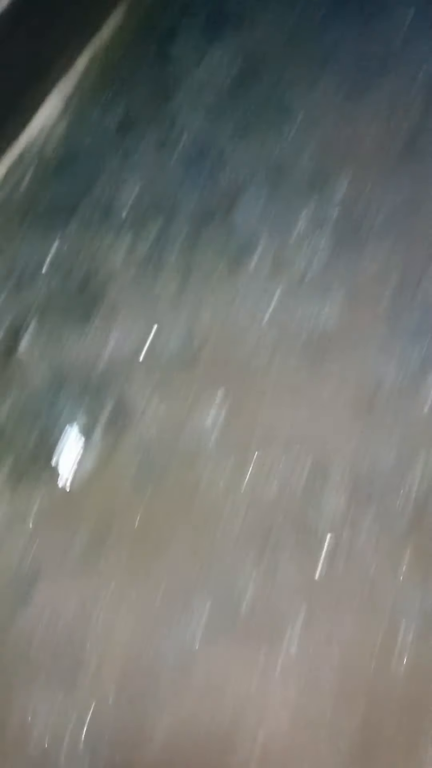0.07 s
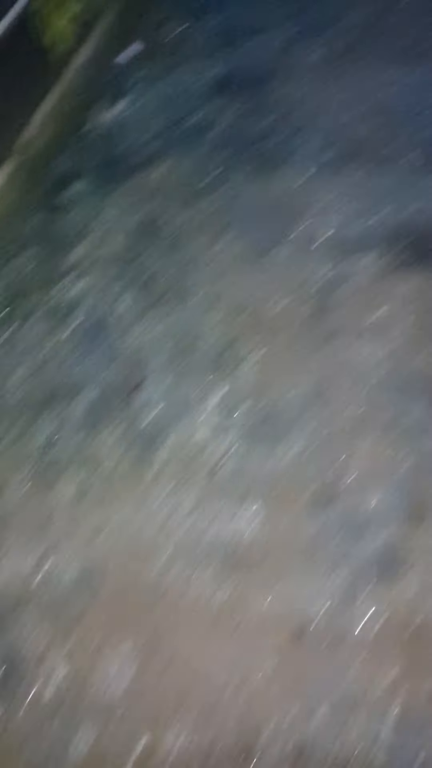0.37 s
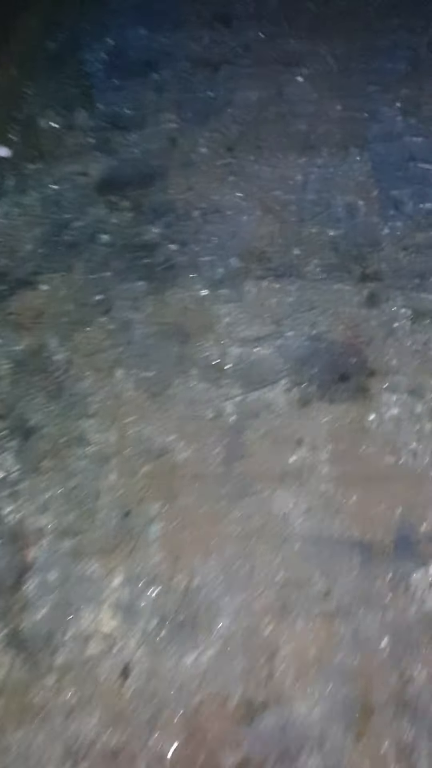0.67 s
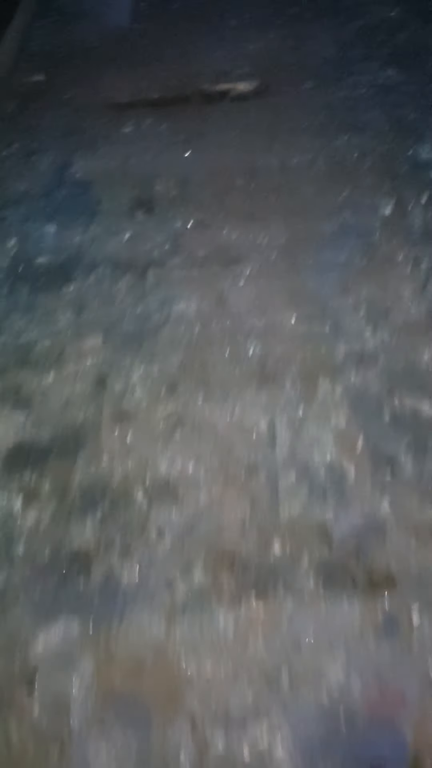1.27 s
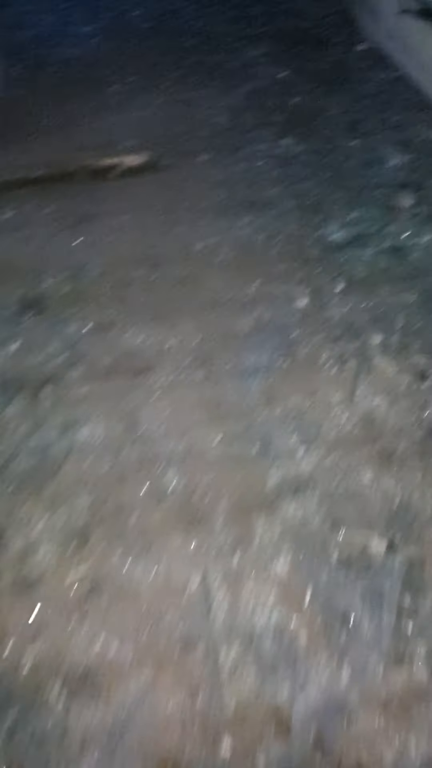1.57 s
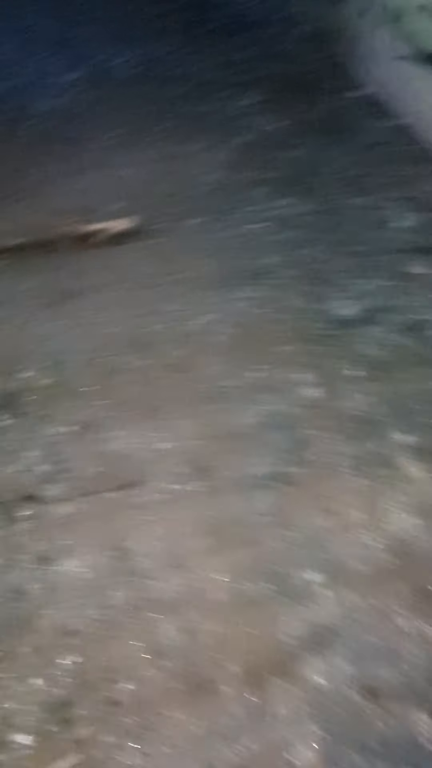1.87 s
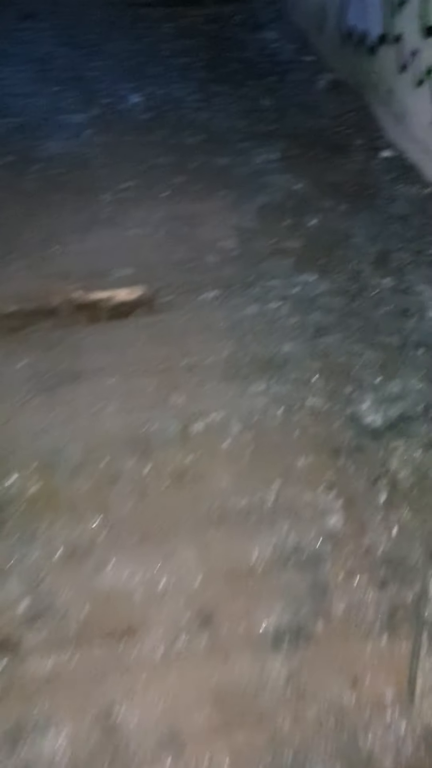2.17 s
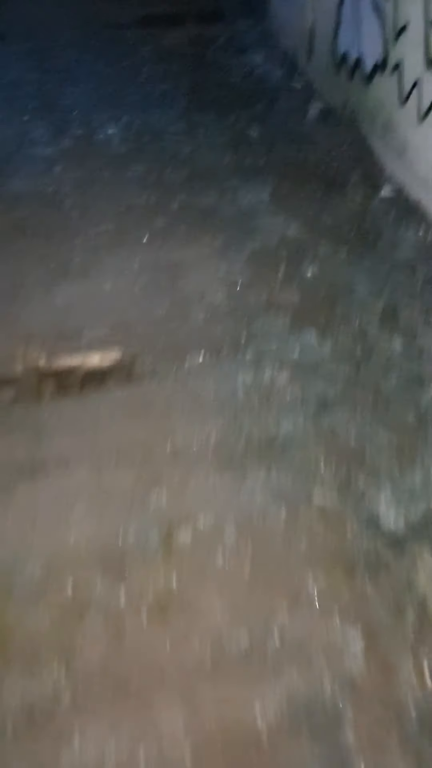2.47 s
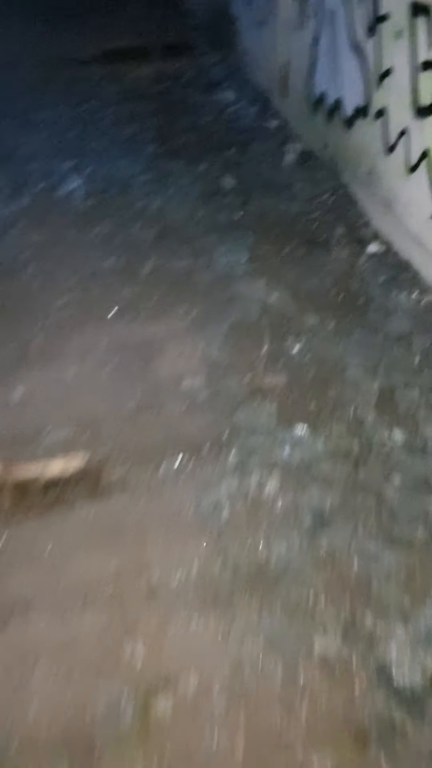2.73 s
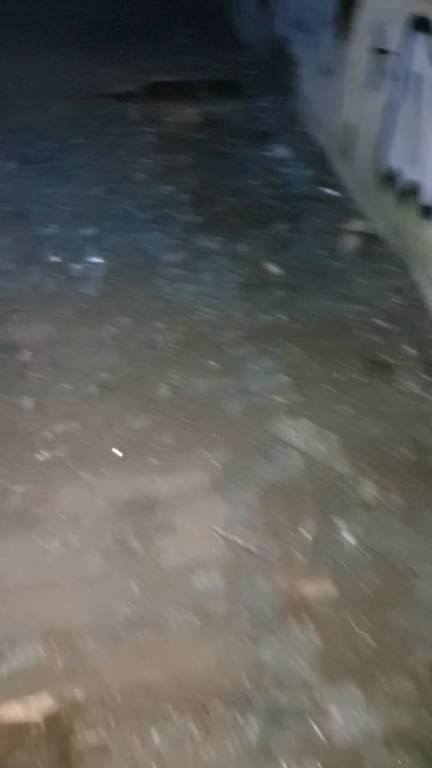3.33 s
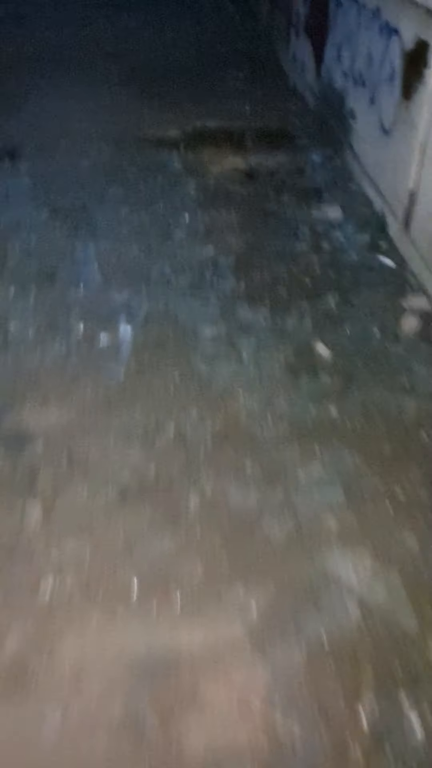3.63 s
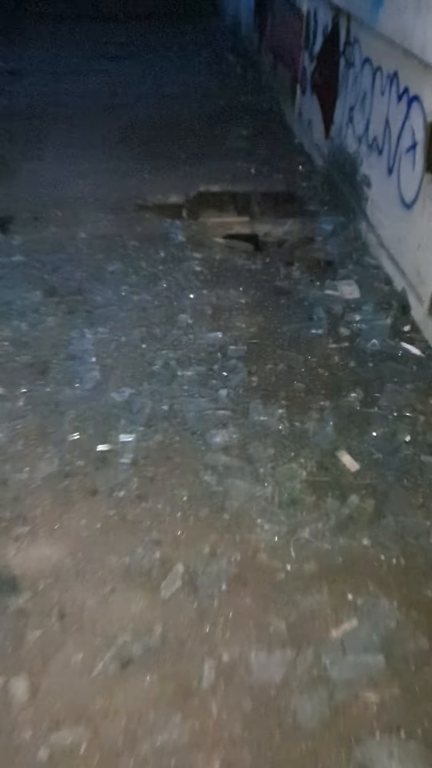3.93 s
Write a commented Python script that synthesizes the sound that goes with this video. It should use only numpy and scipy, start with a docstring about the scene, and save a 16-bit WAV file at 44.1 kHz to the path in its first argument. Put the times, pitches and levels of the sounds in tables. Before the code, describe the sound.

Footsteps crunch over grit and broken glass from the start, close by, about one every 0.6 seconds. Larger pieces snap and slivers ring briefly over soft sole thuds, scrapes and a faint trouser swish. The sharpest crunch comes near 1.9 seconds, and the steps grow lighter later. At about 3.3 seconds a foot knocks a hollow object. The empty hall adds a quiet echo and low rumble.

```python
"""Footsteps crunch over grit and broken glass in an empty concrete hall, heard from a phone in hand.
Each step crushes many tiny grains, while bigger pieces snap and glass slivers ring.
Under that, soles thud and scrape, trouser legs swish and a small loose piece rattles.
Late on, a foot knocks a hollow object, and a tiny tap on the phone follows.
The hall adds a quiet echo and a low rumble."""
import sys
import numpy as np
from scipy import signal
from scipy.fft import rfft, irfft, next_fast_len
from scipy.io import wavfile

SR = 44100
rng = np.random.default_rng(int(sys.argv[2]) if len(sys.argv) > 2 else 0)


def master_out(mix):
    """Clip the mix to full scale and print it as 16-bit PCM to the path in sys.argv[1]."""
    frames = np.transpose(np.atleast_2d(mix))
    ceiling = np.clip(frames, -1, 1)
    pcm = np.round(ceiling * 32767).astype(np.int16)
    wavfile.write(sys.argv[1], SR, pcm)


N = 176400

GRAINS_PER_S = 800
LEFT_LAG_S = 0.00041086  # the steps reach the left microphone this much later
CRUNCH_ECHO_DB, CRACK_ECHO_DB = 0.5, -3  # quick echoes, relative to the direct sound


def amp(db):
    """Turn decibels into a gain."""
    return 10 ** (np.asarray(db, float) / 20)


def unit(x):
    """Scale x to an average power of one."""
    return x / np.sqrt(np.mean(x ** 2))


def clock(seconds):
    """The time of each sample."""
    return np.arange(int(seconds * SR)) / SR


def fade(t, t60):
    """Die away by 60 dB every t60 seconds."""
    return np.exp(-np.log(1000) * t / t60)


def add(out, start, x):
    """Mix x in at start seconds."""
    i = max(int(start * SR), 0)
    out[..., i:i + x.shape[-1]] += x[..., :max(out.shape[-1] - i, 0)]


def colour(x, hz, db, size=4096):
    """Make each frequency louder or softer, along a curve through the given points."""
    f = np.maximum(np.fft.rfftfreq(size, 1 / SR), 1)
    cepstrum = irfft(np.log(amp(np.interp(np.log(f), np.log(hz), db))))
    cepstrum[1:size // 2] *= 2  # folded so that the filter never rings ahead of the sound
    cepstrum[size // 2 + 1:] = 0
    return signal.fftconvolve(x, irfft(np.exp(rfft(cepstrum))))[:len(x)]


def burst(t, tone, t60):
    """A fading puff of noise, shaped by a tone curve."""
    life = fade(t, t60)
    noise = colour(rng.standard_normal(len(t)) * life, *np.array(tone).T)
    return unit(noise) * np.sqrt(np.mean(life ** 2))


def arrive(x, lag):
    """The sound reaches the right microphone first, the left one lag seconds later."""
    size = next_fast_len(len(x))
    delay = np.exp(-2j * np.pi * np.fft.rfftfreq(size, 1 / SR) * lag)
    left = irfft(rfft(x, size) * delay, size)
    return np.array([left[:len(x)], x])


def diffuse(size):
    """Noise from all around: alike at both microphones in the bass, unrelated in the treble."""
    common = colour(rng.standard_normal(size), [300, 1000], [-.3, -3])
    side = colour(rng.standard_normal(size), [130, 300, 1000], [-13, -9, -3])
    return np.array([common + side, common - side])


def rumble(level_db=-44):
    """The hall's steady, low background noise."""
    # tone of the rumble: f/Hz, gain/dB
    tone = [(20, -11.5), (48, 1.5), (80, -4), (170, -5), (260, -6), (400, -12), (700, -23), (1500, -33.5),
            (3500, -41), (14000, -44)]
    noise = np.array([colour(side, *np.array(tone).T) for side in diffuse(N)])
    return amp(level_db) * unit(noise)


def hall(x):
    """The hall's quiet echo, which dies sooner in the treble."""
    # echo bands: f/Hz, t60/s, level/dB
    bands = [(150, 0.82, -13.5), (597, 1, -16.5), (1980, 0.8, -19), (6030, .72, -18.5), (14000, .62, -18.5)]
    t = clock(1.5)
    spectrum, response = rfft(diffuse(len(t))), 0
    log_f = np.log(np.maximum(np.fft.rfftfreq(len(t), 1 / SR), 1))
    log_centres = np.log([row[0] for row in bands])
    for share, (_, t60, db) in zip(np.eye(len(bands)), bands):
        noise = irfft(spectrum * np.interp(log_f, log_centres, share), len(t))
        tail = fade(t, t60) * (1 - np.exp(-t / 0.0106))
        response = response + amp(db) * noise * tail / np.sqrt(np.sum(tail ** 2))
    return signal.fftconvolve(x[None], response, axes=1)[:, :N]


def underfoot(x, echo_db, echo_t60=.09, patchy_db=1.6, lag_spread_s=.000025):
    """Each spot on the floor has its own pitches, direction and quick echoes from floor and body."""
    t = clock(.1)
    bounces = diffuse(len(t)) * fade(t, echo_t60) * (t > .001)
    bounces /= np.sqrt(np.sum(bounces ** 2) / 2)
    bounces = np.array([colour(side, [1000, 12000], [0, -1]) for side in bounces])
    hz = np.arange(2000, 16000, 400)
    patch_db = patchy_db * rng.standard_normal(len(hz)).clip(-1.5, 1.5) * (hz > hz[0])
    x = colour(np.pad(x, (0, len(t))), hz, patch_db)
    direct = arrive(x, LEFT_LAG_S + lag_spread_s * rng.standard_normal())
    echoes = signal.fftconvolve(x[None], bounces, axes=1)[:, :len(x)]
    return (direct + amp(echo_db) * echoes) / np.hypot(1, amp(echo_db))


def phone_tap(start=3.8048, hz=4950, db=-11, t60=0.00328):
    """A tiny tap on the phone, heard on the right only."""
    out, t = np.zeros((2, N)), clock(.02)
    add(out[1], start, amp(db) * np.sin(2 * np.pi * hz * t) * fade(t, t60))
    return out


def trousers(hz=340):
    """Cloth swishes softly as the legs swing past."""
    # leg swings: middle t/s, half length/s, level/dB
    swings = [(0.03, 0.15, -42), (1.757, 0.12, -39), (2.494, 0.42, -45)]
    t = np.arange(N) / SR
    swell = sum(amp(db) * np.exp(-((t - middle) / half) ** 2) for middle, half, db in swings)
    tone_hz = hz * np.array([.2, .7, 1.2, 2.4, 12])
    return swell * unit(colour(rng.standard_normal(N), tone_hz, [-15.5, -1.5, -2.5, -19, -41.5]))


def thuds(t60=0.14):
    """Soles meet the floor with a dull thud."""
    # soles landing: t/s, level/dB, f/Hz
    landings = [(.073, -35.5, 650), (.115, -30, 175), (.778, -31, 201), (.915, -31, 169), (1.442, -37, 400),
                (1.885, -38, 239), (2.53, -33.5, 270), (3.21, -37.5, 423)]
    out, t = np.zeros(N), clock(.25)
    for start, db, hz in landings:
        puff = rng.standard_normal(len(t)) * fade(t, t60)
        thud = colour(puff, hz * np.array([.25, .65, 1.3, 3, 9]), [-20, 0, 0, -20, -60])
        add(out, start, amp(db) * thud / np.sqrt(np.sum(thud ** 2) / (0.023 * SR)))
    return out


def rattle(gain_db=2, t60=0.016):
    """One small loose piece clicks again and again as the legs move."""
    # clicks of the piece: t/s, relative level/dB
    clicks = [(1.389, -25.5), (1.405, -27), (1.432, -30), (1.5447, -35), (1.5986, -41.5), (1.6574, -42.5),
              (1.7013, -43), (1.7737, -39), (1.848, -36), (1.8703, -20), (3.5037, -33.5), (3.528, -33),
              (3.576, -29.5)]
    # tone of a click: f/Hz, gain/dB
    tone = [(900, -15), (1800, -7), (2300, 0), (3200, -12), (7000, -16), (14000, -19)]
    out, t = np.zeros((2, N)), clock(.05)
    for start, db in clicks:
        add(out, start, underfoot(amp(db + gain_db) * burst(t, tone, t60), CRACK_ECHO_DB))
    return out


def knock(start=3.3148, ring_db=-17.5, blow_db=-10, grit_db=-19.5):
    """A foot hits a hollow object, which barks, rings and jolts grit loose on the floor."""
    # the object's ringing notes: f/Hz, relative level/dB, t60/s
    notes = [(171.6, -8, 0.54), (235.4, -14, 0.42), (323, -7, 0.33), (403, 1.5, 0.32), (516, 7, 0.023),
             (481, -10.5, 0.27), (562, -13, 0.4), (668, -1, .11), (740, -5, .18), (1084, -3, 0.067)]
    # tone of the blow: f/Hz, gain/dB
    blow_tone = [(80, -19), (180, -8), (330, -2), (720, 4.5), (950, -3), (1600, -2), (2700, -16),
                 (8000, -43)]
    # tone of the jolted grit: f/Hz, gain/dB
    grit_tone = [(1500, 2.5), (5500, -1.5), (9000, -1.5), (12000, 5.5), (16000, -2.5)]
    out, t = np.zeros((2, N)), clock(.6)
    ring = sum(amp(db) * np.sin(2 * np.pi * hz * t) * fade(t, t60) for hz, db, t60 in notes)
    blow = amp(blow_db) * burst(t, blow_tone, t60=0.12)
    jolt = amp(grit_db) * burst(t, grit_tone, t60=0.11)
    add(out, start, arrive(amp(ring_db) * ring + blow, lag=0.00029))
    add(out, start, underfoot(jolt, CRUNCH_ECHO_DB))
    return out


def fragment(t, t60, count=10):
    """A small piece rings at random pitches, from low to very high."""
    hz = 300 + 16000 * (np.arange(count) + rng.random(count)) / count
    lives = t60 * np.exp(.5 * rng.standard_normal(count))
    notes = np.sin(2 * np.pi * (hz[:, None] * t + rng.random((count, 1))))
    ring = (notes * fade(t, lives[:, None])).sum(0)
    return ring / np.sqrt(np.sum(ring ** 2))


def grit(seconds, per_s, count=48, spread_db=5, powder_db=-15):
    """A stream of breaking grains, many small and a few large, over a hiss of fine powder."""
    grains = [fragment(clock(.015), t60=.004) for _ in range(count)]
    out = np.zeros(int(seconds * SR))
    for when, smallness, pick in rng.random((int(seconds * per_s) + 1, 3)):
        strength = amp(-spread_db * np.log(max(smallness, .05)))
        add(out, when * seconds, strength * grains[int(pick * count)])
    return unit(unit(out) + amp(powder_db) * rng.standard_normal(len(out)))


def under_sole(x, levels_db):
    """Set a sound's level in four bands, then give it the tone of sole and floor."""
    # low, mid, bright and top bands: lower f/Hz, upper f/Hz
    bands = [(300, 900), (900, 3000), (3000, 8000), (10000, 16000)]
    # tone of sole and floor: f/Hz, gain/dB
    tone = [(80, -7.5), (300, -1.5), (600, 0.5), (900, 3), (1300, 3), (2200, -2.5), (3300, 0), (5000, -1)]
    lower, upper = np.array(bands, float).T
    db = np.array(levels_db) + 10 * np.log10(SR / 2 / (upper - lower))  # allow for each band's width
    return colour(colour(x, np.sqrt(lower * upper), db), *np.array(tone).T)


def crumbs(per_s=60):
    """Loose crumbs drop faintly between the steps."""
    times = [.05, .25, .9, 1.02, 1.3, 1.5, 2.1, 3.7, 3.85]
    gains = [0.11, 2.6, 1.2, 0.094, 0.145, 0.53, 1.2, 0.94, 0.021]
    patter = under_sole(grit(N / SR, per_s), [-69, -60, -68, -66])
    return arrive(np.interp(np.arange(N) / SR, times, gains) * patter, LEFT_LAG_S)


def scrapes():
    """Grains dragged under the sole rasp around one rough pitch."""
    # drags of the sole: t/s, length/s, level/dB, f/Hz
    drags = [(0.099, 0.059, -29, 940), (.18, 0.043, -30.5, 910), (0.654, .14, -32, 1100),
             (1.25, 0.098, -36, 610)]
    out = np.zeros((2, N))
    for start, seconds, db, hz in drags:
        grains = grit(seconds, GRAINS_PER_S)
        rasp = unit(colour(grains, hz * np.array([.5, .85, 1.15, 2, 10]), [-17, 0, 0, -17, -50]))
        swell = np.sqrt(np.hanning(len(rasp)))
        add(out, start, underfoot(amp(db) * rasp * swell, CRUNCH_ECHO_DB))
    return out


def shards(detune=0.0147):
    """Each glass sliver rings at two pitches close together."""
    # ringing slivers: t/s, f/Hz, level/dB, t60/s
    slivers = [(.119, 15100, -25, .1), (.853, 10900, -34, 0.17), (1.373, 7260, -24.5, 0.095),
               (1.983, 5750, -28.5, 0.16), (1.985, 13330, -27, .14), (2.2, 4740, -25, .05),
               (2.202, 8210, -26, 0.1), (2.244, 5800, -31, 0.13), (2.615, 8950, -36, 0.14),
               (3.588, 5890, -31.5, 0.18)]
    out, t = np.zeros(N), clock(.3)
    for start, hz, db, t60 in slivers:
        second_hz = hz * (1 + detune * rng.standard_normal())
        pair = np.sin(2 * np.pi * hz * t) + .5 * np.sin(2 * np.pi * second_hz * t)
        add(out, start, amp(db) * pair * fade(t, t60))
    return arrive(out, lag=0.00035)


def cracks(gain_db=-1.5, split_db=-7.5, ring_db=-9):
    """Larger pieces snap with a sharp click, split once more and ring briefly."""
    # snapping pieces: t/s, then relative level/dB in the mid, bright and top bands
    pieces = [(0.105, -36, -37.5, -34), (0.256, -28, -42, -48), (0.3303, -28, -27, -35),
              (0.3343, -33, -31.5, -38.5), (0.352, -19, -31, -25.5), (0.49, -33, -37, -31),
              (0.5205, -29.5, -35, -35), (0.5336, -22, -37, -24.5), (0.5955, -27, -36, -30),
              (1.262, -36, -25, -34), (1.2865, -28, -22, -28), (1.331, -33, -21, -33.5),
              (1.373, -26.5, -21, -30), (1.8486, -48, -37, -40), (1.925, -21, -20, -31),
              (1.9826, -27, -31, -29), (1.991, -27, -23.5, -31), (2.09, -35, -34, -34.5),
              (2.118, -44.5, -31, -30.5), (2.167, -34, -34, -28), (2.2003, -26.5, -21.5, -26),
              (2.205, -31, -23, -28), (2.31, -41, -33, -31), (2.399, -27.5, -27, -27),
              (2.506, -24.5, -33, -27), (2.783, -39.5, -35.5, -59), (2.836, -35, -25.5, -39),
              (2.892, -48, -28, -38), (2.9146, -56.5, -34, -37), (2.9626, -59, -36.5, -37),
              (3.055, -31, -36, -34), (3.092, -25, -25, -24), (3.211, -34, -55, -38),
              (3.4204, -39, -38, -39.5), (3.6651, -37.5, -33, -32)]
    out, t = np.zeros((2, N)), clock(.06)
    for start, mid, bright, top in pieces:
        size = np.clip(1 + (max(mid, bright) + 27) / 14, .45, 1)
        t60 = 0.0085 * size  # small pieces snap faster
        snap = fade(t, t60)
        since_split = t - .005 * rng.uniform(.5, 1)
        split = size * amp(split_db) * (since_split > 0) * fade(abs(since_split), t60)
        click = rng.standard_normal(len(t)) * (snap + split) / np.sqrt(np.sum(snap ** 2))
        ring = amp(ring_db) * fragment(t, t60=0.057)
        crack = under_sole((click + ring) * np.sqrt(0.0052 * SR), [mid - 11.5, mid, bright, top])
        add(out, start, underfoot(crack, CRACK_ECHO_DB))
    return amp(gain_db) * out


def crunches(gain_db=-1.5, seconds=.35):
    """Grit is crushed as the walker's weight comes on, holds and leaves."""
    # heel, roll and toe pressing down: t/s, rise/s, hold/s, time to fall 25 dB/s,
    # then relative level/dB in the low, mid, bright and top bands
    presses = [(0.092, 0.032, 0.024, 0.07, -29, -30, -27.5, -24.5),
               (0.16, 0.00455, 0.0104, 0.07, -29, -32.5, -29, -32),
               (0.189, 0.0071, 0.013, 0.09, -30, -31.5, -31.5, -36.5),
               (0.372, 0.013, 0.007, 0.14, -37, -25.5, -34.5, -36.5),
               (0.533, 0.0023, 0.012, 0.13, -49, -29, -37.5, -36.5),
               (0.64, 0.0044, 0.037, 0.07, -35, -23, -29.5, -33.5),
               (0.68, 0.03, 0.055, 0.09, -32.5, -32.5, -27, -29),
               (0.8, 0.0215, 0.063, 0.03, -44.5, -51, -43, -37.5),
               (0.896, 0.012, 0.023, 0.02, -40, -52, -42, -38),
               (1.243, 0.042, 0.054, 0.0855, -31, -32, -25.5, -29.5),
               (1.369, 0.0028, 0.0066, 0.02, -37.5, -29.5, -27, -29.5),
               (1.425, 0.011, 0.012, 0.0442, -36, -35, -46, -48),
               (1.873, 0.016, 0.017, 0.0451, -28.5, -24, -21, -25),
               (1.921, 0.0035, 0.0096, 0.08, -26.5, -27, -24.5, -32),
               (1.971, 0.0094, 0.014, 0.17, -38.5, -35.5, -27, -32.5),
               (2.239, 0.0034, 0.0062, 0.08, -44, -33, -30, -35),
               (2.308, 0.02, 0.2, 0.08, -43, -39, -37, -35),
               (2.444, 0.0041, 0.063, 0.06, -40.5, -33, -34.5, -40.5),
               (2.52, 0.012, 0.046, 0.11, -36.5, -26, -25, -34),
               (2.774, 0.0088, 0.062, 0.4, -55, -52.5, -41, -59),
               (3.013, 0.0048, 0.0193, 0.2, -43, -48, -40.5, -41),
               (3.05, 0.036, 0.0071, 0.13, -35, -29.5, -28, -32),
               (3.571, 0.0048, 0.024, 0.031, -39.5, -43, -36.5, -45.5),
               (3.615, 0.014, 0.039, 0.04, -39, -38, -36.5, -39.5)]
    out, t = np.zeros((2, N)), clock(seconds)
    for start, rise, hold, fall, *levels_db in presses:
        press = np.minimum(t / max(rise, .001), 1) ** 1.2
        weight = press * amp(-25 * np.maximum(t - rise - hold, 0) / fall)
        crush = grit(seconds, GRAINS_PER_S) * weight
        crush *= np.sqrt(np.sum(weight ** 2) / np.sum(crush ** 2))  # same energy however grains fall
        add(out, start, underfoot(under_sole(crush, levels_db), CRUNCH_ECHO_DB))
    return amp(gain_db) * out


def scene():
    """The steps and the knock echo in the hall, joined by its rumble and the tap on the phone."""
    steps = crunches() + crumbs() + cracks() + rattle() + scrapes() + shards()
    steps += arrive(thuds() + trousers(), LEFT_LAG_S)
    hit = knock()
    return rumble() + hall(steps[1] + 0.91 * hit[1]) + phone_tap() + hit + steps


def record(dry, top_hz=16000):
    """The microphone openings colour the treble; too-loud peaks are clipped and the top is cut."""
    # tone of the openings: f/Hz, left gain/dB, right gain/dB
    openings = [(200, 0.87, -0.06), (1500, 0.56, -0.7), (4500, 1, -.5), (6470, 1.5, 1.5), (8900, -12, -9),
                (10800, -6.5, -0.5), (13250, -5, 6), (15500, -11, 2)]
    hz, *sides_db = np.array(openings).T
    clipped = np.clip([colour(side, hz, db) for side, db in zip(dry, sides_db)], -1, 1)
    return signal.sosfilt(signal.ellip(10, .2, 70, top_hz, fs=SR, output="sos"), clipped)


dry = scene()
out = record(dry)
master_out(out)
```